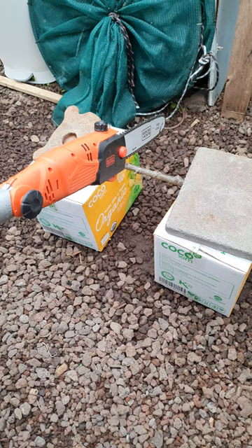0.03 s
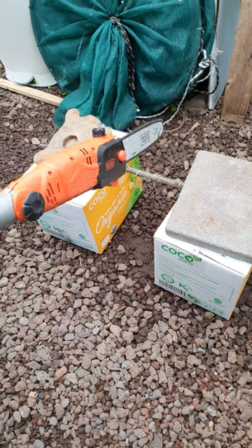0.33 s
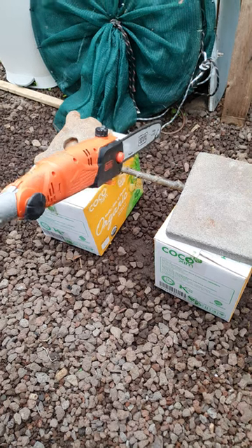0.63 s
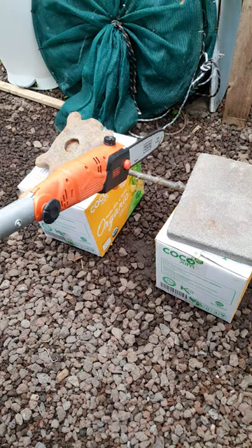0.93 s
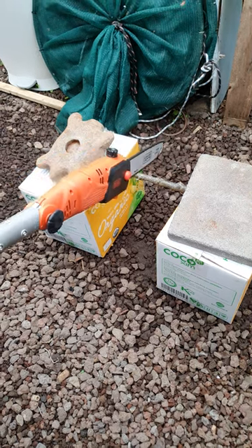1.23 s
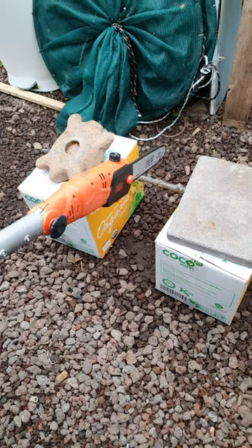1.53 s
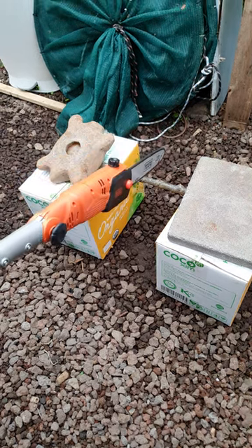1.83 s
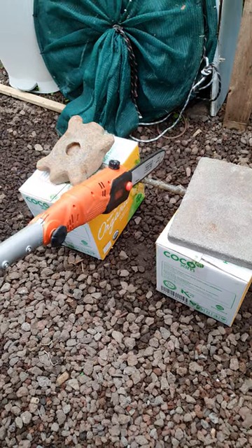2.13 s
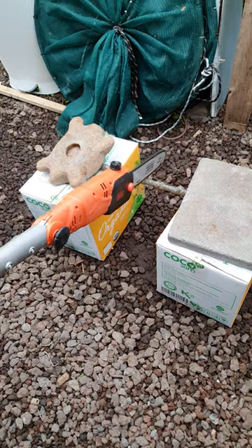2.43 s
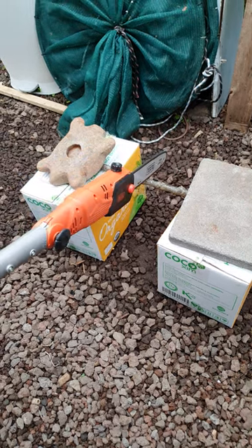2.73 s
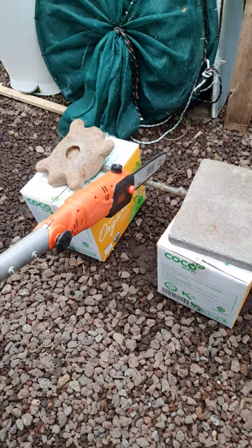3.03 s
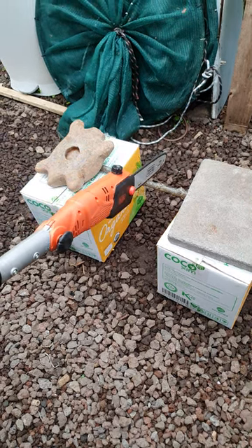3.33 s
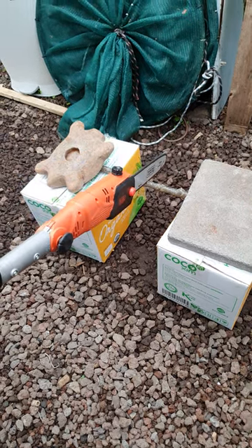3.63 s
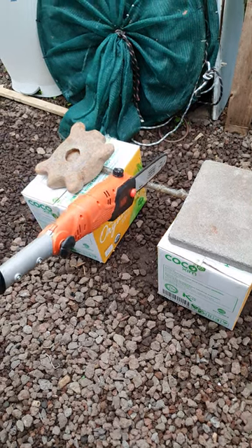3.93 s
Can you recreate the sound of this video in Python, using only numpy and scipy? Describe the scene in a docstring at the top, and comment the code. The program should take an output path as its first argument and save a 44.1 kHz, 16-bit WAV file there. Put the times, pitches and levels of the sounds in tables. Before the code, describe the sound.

Electric pole saw whining up to speed, chain rattling, with hollow cardboard knocks later.

```python
"""A low outdoor hum and two faint trigger ticks, then an electric pole saw starts a pole's length away.
Its motor runs up to a shrill fan whine while the chain links rattle round the bar.
From two seconds on the saw seems to graze a cardboard box: the hollow box drums, knocks and drones,
and the load drags the speed down a little."""
import sys
import numpy as np
from scipy import signal
from scipy.fft import rfft, irfft
from scipy.io import wavfile
from scipy.ndimage import uniform_filter1d

SR = 44100
rng = np.random.default_rng(int(sys.argv[2]) if len(sys.argv) > 2 else 0)


def master_out(mix):
    """Clip the mix to full scale and print it as 16-bit PCM to the path in sys.argv[1]."""
    frames = np.transpose(np.atleast_2d(mix))
    ceiling = np.clip(frames, -1, 1)
    pcm = np.round(ceiling * 32767).astype(np.int16)
    wavfile.write(sys.argv[1], SR, pcm)


N = 176400
T = np.arange(N) / SR
HZ = np.fft.rfftfreq(N, 1 / SR)
ON_S, FAN_BLADES, RIPPLE_HZ = .319, 19, 100  # switch-on; blades on the fan; mains ripple

# motor speed, heard as the fan's pitch: time_s, pitch_hz
FAN_PITCH = [(0.44, 6380), (0.5, 7560), (0.53, 7900), (0.55, 8230), (0.6, 8670), (0.66, 9050), (0.75, 9490),
             (0.85, 9760), (1.0, 9990), (1.25, 10240), (1.5, 10310), (1.95, 10430), (2.08, 10420),
             (2.23, 10460), (2.57, 10270), (3.0, 10200), (3.3, 10120), (4.0, 10090)]
# fan whine envelope: time_s, level_db, left_minus_right_db
WHINE_ENVELOPE = [(.32, -33, -4), (.41, -39, 0), (.44, -21.5, -15), (.52, -13, 2), (.535, -26, 0),
                  (.55, -9.5, -3), (.6, -16.5, -7), (.63, -23, 10), (.66, -14, -6), (.73, -14.5, -9.5),
                  (.9, -21.5, -8), (1.25, -21, -4), (1.42, -21, -2), (1.66, -24, -8.5), (1.8, -19, 0),
                  (1.96, -25.5, 5), (2.04, -21, 0), (2.3, -21.5, -1), (2.45, -16.5, -2.5),
                  (2.95, -16.5, -1.5), (3.2, -17, -3.5), (3.5, -18, -8.5), (4, -18, -5.5)]
# motor and gear tones: shaft_multiple
GEAR_MULTIPLES = (.9, 1, 1.8, 2, 3, 3.6, 4, 6, 8, 18, 20)
# their balance while running up: relative_db
GEAR_RUN_UP_DB = (-52, -39, -40, -36, -47, -42, -50, -41, -55, -50, -44)
# their balance at full speed: relative_db
GEAR_FULL_DB = (-49, -50, -41, -34, -40, -43, -45, -46, -48, -48, -42)
# their common fader: time_s, gain_db
GEAR_ENVELOPE = [(.5, -1.5), (1.2, -3), (2.4, 0), (3.05, -1.5), (3.5, -7.5), (4, -5)]

# rattle colour while running up: frequency_hz, relative_db
RATTLE_RUN_UP = [(30, -38), (130, -33), (220, -14.5), (450, -10.5), (800, -5.5), (1300, -3), (1620, -0.5),
                 (2100, -1.5), (2450, -7.5), (2780, 1), (3020, -4), (3330, -3), (4200, -5.5), (5100, -7.5),
                 (5570, -5.5), (5900, -8), (6350, -4.5), (6900, -10), (7300, -9.5), (8200, -17),
                 (9600, -13.5), (10600, -16.5), (12200, -15.5), (13800, -19), (15400, -18)]
# rattle colour at full speed: frequency_hz, relative_db
RATTLE_FULL = [(30, -42), (130, -37.5), (250, -25), (480, -15), (850, -8), (1300, -7), (1600, -2.5),
               (2150, -3.5), (2450, -7.5), (3400, -5), (4100, -7), (4950, -7.5), (5450, -7.5), (6000, -5.5),
               (6700, -6.5), (7250, -11.5), (7600, -6.5), (8050, -15), (8900, -10), (9400, -11.5),
               (10000, -11.5), (11300, -13), (13000, -15), (14500, -14), (15600, -21.5)]
# rattle envelope: time_s, level_db
RATTLE_ENVELOPE = [(.319, -41), (.337, -25), (.34, -18), (.355, -19.5), (.385, -13), (.53, -13.5),
                   (.7, -16), (.85, -17.5), (1.1, -18.5), (1.5, -18), (1.9, -18), (2.4, -17), (3.1, -17.5),
                   (4, -18)]
# rattle stereo image: frequency_hz, coherence, left_minus_right_db, left_lead_rad
RATTLE_STEREO = [(100, 1, 7.5, -1.5), (370, 0.95, -7.5, 0.05), (755, 0, 0, 0.8), (1100, 0.07, 1, 0),
                 (1760, 0.6, -8.5, 0.95), (3240, 0.14, 0.5, 1.6), (5450, 0.28, -2.5, 2.24),
                 (7260, 0, -5, 3.5), (8080, 0.53, -4.5, 3.5), (8900, 0.4, -5.5, 5.5),
                 (11000, 0.3, 0.5, 5.5), (15000, 0.1, -3.5, 5.5)]
# resonances of bar and housing, at depth 1: centre_hz, width_hz, boost_db
BAR_RESONANCES = [(750, 42, 2.5), (1276, 30, 0.5), (1620, 80, 1.5), (1806, 40, 1), (2183, 85, 4),
                  (2835, 28, 3.5), (3350, 83, 3.5), (5500, 95, 4), (6300, 180, 1.5)]

# drumming on the box: time_s, level_db
DRUM_ENVELOPE = [(1.97, -54), (1.995, -34.5), (2.05, -31), (2.1, -54), (2.215, -64), (2.25, -28),
                 (2.3, -39), (2.41, -32.5), (2.51, -29), (2.55, -38), (2.7, -34.5), (2.75, -38),
                 (2.81, -28.5), (2.85, -45), (2.89, -32.5), (3.05, -30), (3.26, -29.5), (3.38, -34.5),
                 (3.44, -27.5), (3.49, -34), (3.78, -31.5), (4, -32.5)]
# hardest knocks on the box: start_s, peak_db
BOX_KNOCKS = [(2.335, -18), (2.38, -23), (2.409, -21), (2.454, -25), (2.479, -15), (2.503, -13),
              (2.519, -28), (2.689, -17), (2.806, -15.5), (3.242, -16), (3.325, -17), (3.433, -17),
              (3.551, -17)]
# modes of the hollow box: pitch_hz, relative_db, t60_s
BOX_MODES = [(165.5, -10, 0.048), (230.5, -4, 0.04), (289, -6.5, 0.071), (323.2, -3, 0.044),
             (379.5, 3, 0.057), (465, -2.5, 0.077), (533, -9.5, 0.027)]
# partials of the box's drone: chain_loop_multiple
DRONE_MULTIPLES = (10, 11, 18, 25)
# their balance: relative_db
DRONE_PARTIALS_DB = (-5, -7, -10.5, -10)

# trigger ticks: start_s, peak_db
TRIGGER_TICKS = [(.24, -57), (.249, -56)]
# outdoor hum colour: frequency_hz, relative_db
HUM_SPECTRUM = [(20, -18), (45, -21), (70, 3), (95, -6), (130, -40), (200, -10.5), (400, -33.5),
                (1000, -40), (2500, -52), (8000, -62), (16000, -66)]
# outdoor hum fader: time_s, gain_db
HUM_ENVELOPE = [(.11, -3), (.22, -4), (.38, 4), (.6, -4), (1.2, -6), (2, -6), (4, 0)]


def fan_pitch():
    """Motor speed as fan pitch in Hz: a jolt at switch-on, the run-up, then a sag under load."""
    return curve([(ON_S, 899)] + list(FAN_PITCH))


def motor():
    """Fan and gears turn on one shaft, its speed swayed by mains ripple."""
    pitch_hz = fan_pitch() + 2 * drift(15.5)
    ripple = np.sin(2 * np.pi * RIPPLE_HZ * T)
    lead_s = [.00008, 0]  # the left side hears it first
    blade_passes = np.cumsum(pitch_hz) / SR + .046 * ripple + np.outer(lead_s, pitch_hz)
    tones = gear_tones(blade_passes / FAN_BLADES) + fan_whine(blade_passes, ripple)
    return np.sqrt(2) * tones * ramp(ON_S, ON_S + .06)


def fan_whine(blade_passes, ripple):
    """Passing blades make a shrill tone and a faint octave, fluttering most on the way up."""
    flutter = np.array([drift(34.8), drift(34.8)])
    flutter_db = 1.1 + 2.5 * (1 - ramp(ON_S, .78))
    level = amp(curve(WHINE_ENVELOPE) - .5 + flutter_db * flutter) * (1 + .08 * ripple)
    octave = amp(-19 + 4.6 * drift(60)) * np.sin(4 * np.pi * blade_passes)
    return level * pan(curve(WHINE_ENVELOPE, column=2)) * (np.sin(2 * np.pi * blade_passes) + octave)


def gear_tones(shaft_turns):
    """Weaker tones of motor and gears swell in as the shaft gets going."""
    tones = np.zeros((2, N))
    for multiple, run_up_db, full_db in zip(GEAR_MULTIPLES, GEAR_RUN_UP_DB, GEAR_FULL_DB):
        db = run_up_db + (full_db - run_up_db) * ramp(.81, .83)
        tone = np.sin(2 * np.pi * (multiple * shaft_turns + rng.random()))
        tones += tone * amp(db + 2 * drift(6.8))
    return tones * pan(db=4) * amp(curve(GEAR_ENVELOPE)) * ramp(.29, .43)


def chain(top_clicks_per_s=4500, click_share=.35):
    """Links click and scrape round the bar, pulsing with the shaft and the motor's torque."""
    pitch_hz = fan_pitch()
    shaft_turns = np.cumsum(pitch_hz) / SR / FAN_BLADES
    hits = rng.random((2, N)) < top_clicks_per_s / SR * pitch_hz / pitch_hz.max()
    clicks = hits * rng.choice([-1, 1], (2, N))
    clicks = clicks * amp(2.5 * np.minimum(rng.exponential(1, (2, N)), 4))
    scrape = rng.standard_normal((2, N))
    links = np.sqrt(click_share) * unit(clicks) + np.sqrt(1 - click_share) * scrape
    links *= 1 + .055 * np.cos(2 * np.pi * shaft_turns) + .027 * np.sin(2 * np.pi * RIPPLE_HZ * T)
    rattle = spread(flicker(links))
    run_up = colour(bar_ring(rattle, depth=1.8), RATTLE_RUN_UP)  # the slow chain rings the bar harder
    full_speed = colour(bar_ring(rattle, depth=.82), RATTLE_FULL)
    settled = ramp(.55, .95)
    return ((1 - settled) * run_up + settled * full_speed) * amp(curve(RATTLE_ENVELOPE)) * (T > ON_S)


def flicker(rattle, shake_db=.32, patch_db=1.08):
    """The rattle's level trembles, overall and in small patches of time and frequency."""
    bands = signal.stft(rattle * amp(shake_db * drift(110)), nperseg=256)[2]
    patches = uniform_filter1d(rng.standard_normal(bands.shape[1:]), size=5, axis=0)
    patches = unit(uniform_filter1d(patches, size=4, axis=1))
    return signal.istft(bands * amp(patch_db * patches))[1][:, :N]


def spread(rattle):
    """Each band of the rattle gets its own stereo width, balance and phase."""
    common, separate = rfft(rattle)
    coherence = by_hz(RATTLE_STEREO)
    left = common * np.exp(1j * by_hz(RATTLE_STEREO, column=3))
    right = coherence * common + np.sqrt(1 - coherence ** 2) * separate
    return irfft(np.array([left, right]) * pan(by_hz(RATTLE_STEREO, column=2)), N)


def bar_ring(rattle, depth):
    """Bar and housing lift narrow resonances out of the rattle."""
    boost_db = sum(db / (1 + (2 * (HZ - hz) / width) ** 2) for hz, width, db in BAR_RESONANCES)
    return irfft(rfft(rattle) * amp(depth * boost_db), N)


def box_drumming():
    """A flurry of uneven bumps and a few hard knocks ring the hollow box."""
    t = T[:SR // 3]
    ring = sum(amp(db - 60 * t / t60) * np.sin(2 * np.pi * hz * t) for hz, db, t60 in BOX_MODES)
    ring /= abs(ring).max()
    bumps_per_s = 130 * amp(5 * drift(90))
    count = np.floor(np.cumsum(bumps_per_s) / SR)
    bumps = np.diff(count, prepend=0) * amp(2 * rng.standard_normal(N))
    bumps /= np.std(signal.fftconvolve(bumps, ring)[:N])
    blows = bumps * amp(curve(DRUM_ENVELOPE)) * (T > DRUM_ENVELOPE[0][0])
    for start_s, db in BOX_KNOCKS:
        blows[round(start_s * SR)] += amp(db)
    low_cut = signal.butter(3, 115, "high", fs=SR, output="sos")
    return signal.sosfilt(low_cut, signal.fftconvolve(blows, ring)[:N])


def box_drone(turns_per_loop=35, rest_db=-36):
    """The circling chain shakes the box at multiples of its loop rate."""
    loops = np.cumsum(fan_pitch()) / SR / FAN_BLADES / turns_per_loop
    drone = sum(amp(db + 1.2 * drift(13)) * np.sin(2 * np.pi * (multiple * loops + .14 * drift(14)))
                for multiple, db in zip(DRONE_MULTIPLES, DRONE_PARTIALS_DB))
    drum_db = curve(DRUM_ENVELOPE)
    level_db = np.minimum(rest_db + .67 * (drum_db - rest_db), drum_db + 2)  # partly rides the drumming
    return np.sqrt(2) * drone * amp(level_db) * (T > DRUM_ENVELOPE[0][0])


def trigger(modes_hz=(4130, 5900), t60_s=.0052):
    """Two faint plastic ticks just before the motor starts."""
    ticks = np.zeros(N)
    for start_s, db in TRIGGER_TICKS:
        age = np.maximum(T - start_s, 0)
        ring = sum(np.sin(2 * np.pi * hz * age) for hz in modes_hz) / 2
        ticks += ring * amp(db - 60 * np.minimum(age / t60_s, 3))
    return ticks


def outdoor_hum():
    """A low bed of noise from the surroundings, nearly the same on both sides."""
    noise = rng.standard_normal(N) + .14 * rng.standard_normal((2, N))
    return amp(curve(HUM_ENVELOPE) - 49.5) * colour(noise, HUM_SPECTRUM)


def amp(db):
    """Decibels to gain."""
    return 10 ** (np.asarray(db) / 20)


def unit(x):
    """Scales to rms 1."""
    return x / np.sqrt(np.mean(x ** 2) + 1e-20)


def ramp(start_s, end_s):
    """A straight fade from 0 to 1."""
    return np.interp(T, (start_s, end_s), (0, 1))


def curve(rows, column=1):
    """A table column as an envelope over time."""
    rows = np.array(rows)
    return np.interp(T, rows[:, 0], rows[:, column])


def by_hz(rows, column=1):
    """A table column as a curve over log frequency."""
    rows = np.array(rows)
    return np.interp(np.log(HZ + 1), np.log(rows[:, 0] + 1), rows[:, column])


def colour(x, spectrum):
    """Equalises x with a spectrum, at rms 1."""
    return unit(irfft(rfft(x) * amp(by_hz(spectrum)), N))


def drift(hz):
    """Random wander of rms 1, up to about hz."""
    return unit(irfft(rfft(rng.standard_normal(N)) * (HZ > 0) / (1 + (HZ / hz) ** 4), N))


def pan(db):
    """Left and right gains, the left louder by db."""
    return amp(np.array([db / 2, -db / 2])).reshape(2, -1)


def scene():
    """The saw, the box a little to the right, and the outdoor bed."""
    saw = trigger() + motor() + chain()
    box = pan(db=-2.5) * (box_drumming() + box_drone())
    return saw + box + outdoor_hum()


def record(dry, open_s=.108, ceiling=.88, cutoff_hz=15800):
    """A quick fade-in, a soft clip on the highest peaks and a steep high cut."""
    opened = dry * ramp(open_s, open_s + .005)
    rounded = opened / (1 + (opened / ceiling) ** 8) ** (1 / 8)
    high_cut = signal.firwin(1023, cutoff_hz, window=("kaiser", 10), fs=SR)
    return signal.oaconvolve(rounded, high_cut[None], "same")


dry = scene()
out = record(dry)
master_out(out)
```